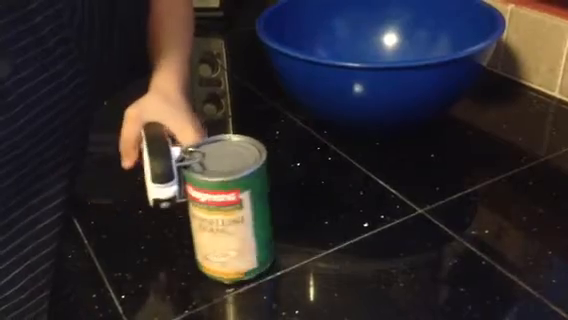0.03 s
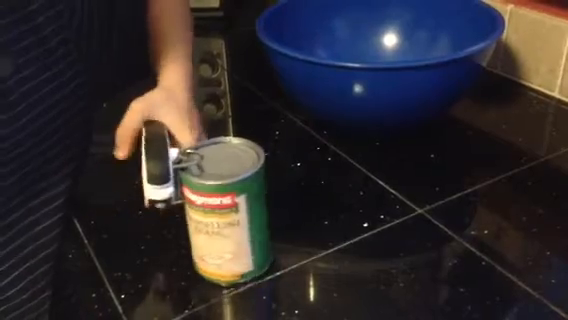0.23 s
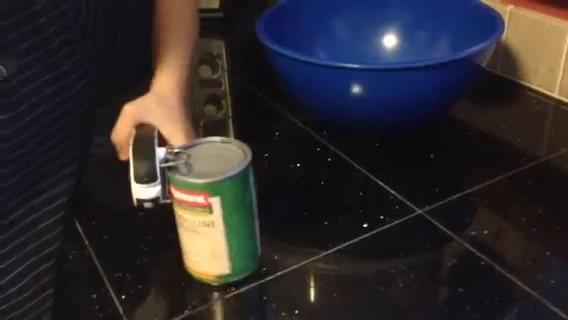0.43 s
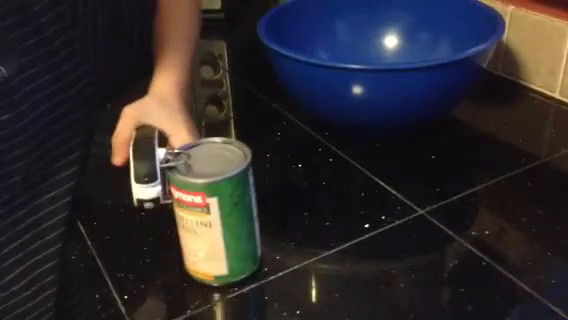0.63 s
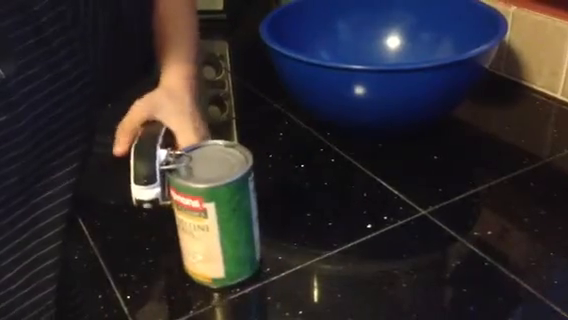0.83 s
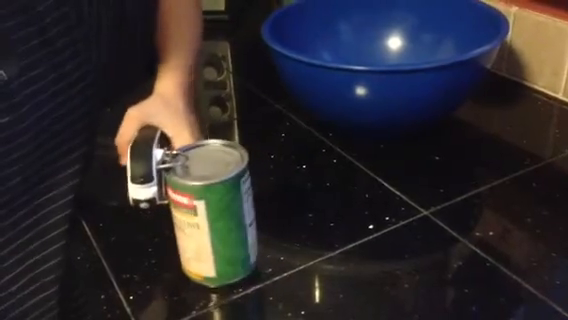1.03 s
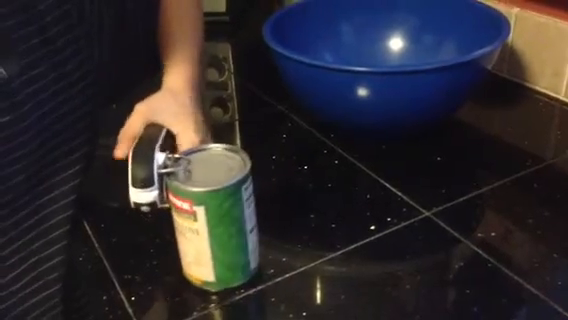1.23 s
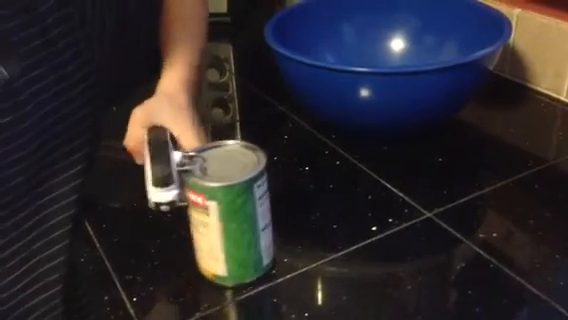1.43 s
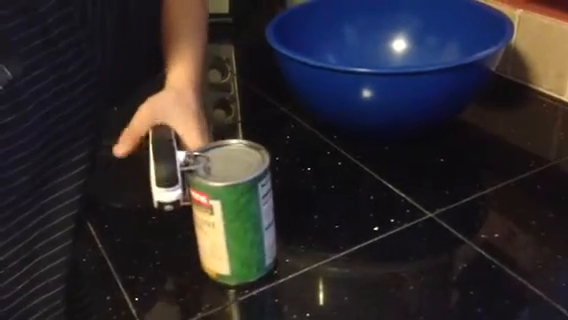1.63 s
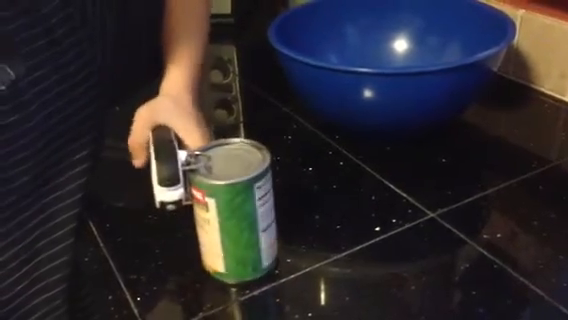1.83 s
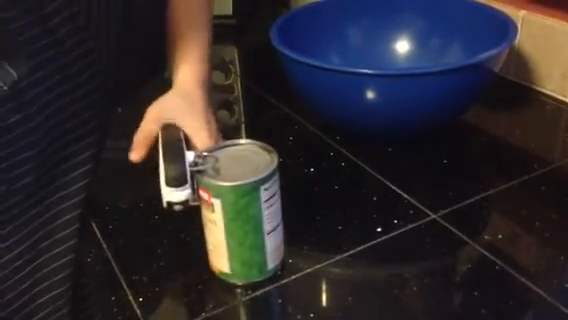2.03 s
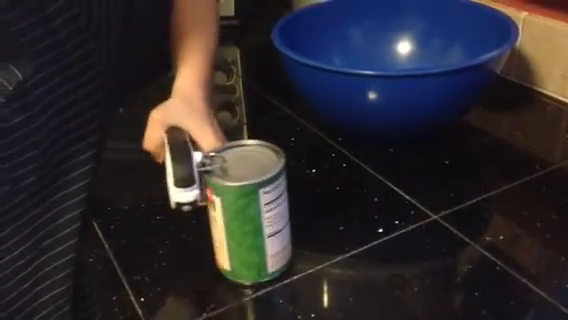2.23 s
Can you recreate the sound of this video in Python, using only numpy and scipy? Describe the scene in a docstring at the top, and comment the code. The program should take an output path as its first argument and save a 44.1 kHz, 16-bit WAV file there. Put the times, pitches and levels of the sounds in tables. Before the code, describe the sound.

A squeeze can opener clicks and ratchets around a tin can in a quiet kitchen.

```python
"""A full tin can knocks on a stone kitchen counter as a squeeze-type opener works round it.
Each release of the handle lets the pawl snap over one to three steel teeth, bright and rattly.
Each squeeze grinds the cutter through the lid and jostles the can; the drive wheel catches
with faint taps. Once the handles clank shut. A small hard room rings after, over a low hush."""
import sys
import numpy as np
from scipy import signal
from scipy.fft import rfft, irfft
from scipy.io import wavfile
from scipy.ndimage import uniform_filter1d

SR = 44100
rng = np.random.default_rng(int(sys.argv[2]) if len(sys.argv) > 2 else 0)


def put_to_file(sound):
    """Save the sound as 16-bit audio at rate SR, in the file named by the first command-line argument."""
    columns = np.atleast_2d(sound).T  # one column per channel
    safe = np.clip(columns, -1, 1)
    whole_steps = np.round(safe * 32767)
    wavfile.write(sys.argv[1], SR, whole_steps.astype(np.int16))


N = 105840
T = np.arange(SR // 3) / SR  # time within one hit, s
SAMPLES_PER_MS = SR / 1000


def amp(db):
    """Decibels to gain."""
    return 10 ** (np.asarray(db) / 20)


def curve_at(points, hz):
    """Reads a curve on a log-frequency axis."""
    f, value = np.transpose(points)
    return np.interp(np.log(hz + 1), np.log(f + 1), value)


def add(mix, start_s, sound):
    """Drops a sound into the mix."""
    part = mix[max(round(start_s * SR), 0):][:len(sound)]
    part += sound[:len(part)]


def normalise(x):
    """Scales to the energy of one millisecond at full level."""
    return x * np.sqrt(SAMPLES_PER_MS / (np.sum(x ** 2) + 1e-20))


def decay(t, t60):
    """Falls 60 dB in t60 seconds."""
    return np.exp(-np.log(1000) * t / np.maximum(t60, 1e-4))


def eq(x, points, size=4096):
    """Minimum-phase EQ through points of f/Hz, level/dB."""
    gain = amp(curve_at(points, np.fft.rfftfreq(size, 1 / SR)))
    cepstrum = irfft(np.log(gain))
    cepstrum[1:size // 2] *= 2
    cepstrum[size // 2 + 1:] = 0
    impulse = irfft(np.exp(rfft(cepstrum)))
    return signal.fftconvolve(x, impulse)[:len(x)]


def burst(colour, attack_s, t60, passes=3, hold_s=0):
    """A dense cluster of short-lived vibrations: a noise hit, evened out in spectrum, then coloured."""
    envelope = np.minimum(T / attack_s, 1) * decay(np.maximum(T - attack_s - hold_s, 0), t60)
    x = rng.standard_normal(len(T)) * envelope
    for _ in range(passes):
        spectrum = rfft(x)
        flat = irfft(spectrum / (abs(spectrum) + 1e-12), len(T))
        x = flat * np.sqrt(envelope)
    return normalise(eq(x, colour))


def ring(modes, t60=None, detune=0.007, attack_s=0.002):
    """Struck modes with their own decays or a shared one; balance and tuning vary from hit to hit."""
    tone = np.zeros(len(T))
    for hz, db, *own_t60 in modes:
        envelope = amp(db + 2 * rng.standard_normal()) * decay(T, own_t60[0] if own_t60 else t60)
        pitch = hz * (1 + detune * rng.standard_normal())
        tone += envelope * np.sin(2 * np.pi * (pitch * T + rng.random()))
    onset = np.sin(np.pi / 2 * np.minimum(T / attack_s, 1)) ** 2
    return normalise(onset * tone)


# Bright edge of a hard contact, for can and pawl: f/Hz, level/dB
CRACK_EQ = [(100, -33), (300, -10.5), (700, -11.5), (1300, -4), (2100, -5.5), (3000, 1.5), (5500, 3.5),
            (7500, -3.5), (11000, -8.5), (15000, -19.5)]
# Tinny bite of the rim: f/Hz, level/dB
RIM_EQ = [(500, -34), (1100, -1.5), (2150, 2), (2800, -8), (15000, -33)]
# Ring of the lid, struck at its rim: f/Hz, level/dB
LID_MODES = [(1150, -3.5), (1250, 2), (1535, -1.5), (1680, -6.5), (1920, -3.5), (2140, -5.5)]
# Hollow clack of the can: f/Hz, level/dB
CLACK_EQ = [(100, -11), (270, -3.5), (680, -7), (1100, -12), (8000, -68)]
# Ring of the can's wall: f/Hz, level/dB, t60/s
WALL_MODES = [(368, -4, 0.044), (659.7, -4.5, 0.072)]
# Low weight of the full can: f/Hz, level/dB, t60/s
THUD_MODES = [(160.3, -11.5, 0.13), (206.8, 7, 0.032), (251, -1, 0.027), (370, -11.5, 0.05)]
# Knock cues, levels before each layer's trim: t/s, thud/dB, clack/dB, rim/dB, tick/dB
KNOCK_CUES = [(0.041, -43.5, -47, -49, -50.5), (.139, -39.5, -45.5, -50.5, -57), (.263, -37, -40, -52, -63),
              (.419, -51, -48.5, -45, -55), (.428, -41, -44, -41, -54), (0.4535, -38, -51, -42, -52.5),
              (0.7518, -29.5, -34, -35.5, -49.5), (1.0212, -41.5, -48.5, -47.5, -53),
              (1.098, -46.5, -47.5, -31.5, -60), (1.171, -35.5, -38.5, -46, -52),
              (1.2335, -47, -74, -52, -45), (1.4626, -46.5, -39.5, -44.5, -53),
              (1.487, -37, -27, -26.5, -22), (1.551, -28, -28.5, -37.5, -44.5),
              (2.356, -55, -39, -41.5, -73)]
SHARP_ATTACK_S, SOFT_ATTACK_S, RIM_T60_S = 0.00065, 0.0056, 0.058


def can_knocks():
    """Each knock: a tick at the contact, the rim and lid, the hollow wall, then the full can's thud."""
    out = np.zeros(N)
    for t, thud_db, clack_db, rim_db, tick_db in KNOCK_CUES:
        tick = amp(4) * burst(CRACK_EQ, SHARP_ATTACK_S, t60=0.032)
        rim = amp(5) * burst(RIM_EQ, SHARP_ATTACK_S, RIM_T60_S)
        lid = amp(4.5) * ring(LID_MODES, t60=0.09)
        clack = amp(4) * burst(CLACK_EQ, SOFT_ATTACK_S, t60=0.059)
        wall = amp(5.5) * ring(WALL_MODES, attack_s=SOFT_ATTACK_S)
        thud = amp(8) * ring(THUD_MODES, detune=0.04, attack_s=0.005)
        add(out, t, amp(tick_db) * tick + amp(rim_db) * (rim + lid) + amp(clack_db) * (clack + wall))
        add(out, t + 0.00738, amp(thud_db) * thud)
    return out


# Rattle of the opener's loose parts: f/Hz, level/dB
RATTLE_EQ = [(100, -18), (300, -4.5), (700, -4.5), (1100, 3), (1600, 9), (2200, 1.5), (3500, 3.5),
             (15000, -7.5)]
# Ring of the opener's steel and the lid: f/Hz, level/dB, t60/s
STEEL_MODES = [(658.6, -9, 0.076), (1260, -4, 0.07), (1430, -3.5, 0.055), (1533, -1.5, 0.06),
               (1674, -3.5, 0.066), (1810, -2, .05), (2556, -2, 0.037)]
# Snap cues, levels relative: t/s, level/dB, body EQ/dB, treble EQ/dB, rattle/dB
SNAP_CUES = [(0.199, -16, 0, 3.5, 0.5), (.218, -9.5, -1.5, 3, -1.5), (0.2321, -12.5, -6.5, 5.5, -4.5),
             (0.7863, -16.5, 1.5, 1, 2), (1.097, -28.5, 1, -3, -16), (1.2738, -14, -1, -2.5, 2),
             (1.2916, -13, 0.5, 4, -1), (1.486, -15.5, -0.5, 0.5, 2.5), (1.6696, -12.5, -1.5, 7.5, -7),
             (1.687, -14, 2, 5, -2.5), (1.7016, -13.5, 0, 7.5, -5.5), (2.087, -13, -3, -3.5, -0.5),
             (2.1082, -14.5, -1, 2, 1.5), (2.3557, -37.5, 5.5, -8.5, 9.5)]


def pawl_snaps(skid_s=0.003, crack_t60=0.0046):
    """The pawl skids over a tooth's tip and lands with a crack; loose parts rattle, the steel rings."""
    out = np.zeros(N)
    for t, db, body_db, treble_db, rattle_db in SNAP_CUES:
        crack = burst(CRACK_EQ, SHARP_ATTACK_S, crack_t60, passes=1, hold_s=0.0009)
        rattle = amp(rattle_db + 1) * burst(RATTLE_EQ, attack_s=0.00044, t60=0.062)
        steel = amp(-4.5) * ring(STEEL_MODES, detune=0.02)
        colour = [(1700, body_db), (3200, 0.005), (5500, 0.0039), (9000, treble_db)]
        add(out, t, amp(db - 3.5) * eq(crack + rattle + steel, colour))
        skid = burst(RATTLE_EQ, skid_s, crack_t60)
        add(out, t - skid_s, amp(db - 16) * skid)
    return out


# Grit of the lid being cut: f/Hz, level/dB
GRIND_EQ = [(100, -9), (300, -10), (640, 3), (1300, -3), (2000, -9), (2800, -19), (15000, -35)]
# Rumble of the can on stone: f/Hz, level/dB
RUMBLE_EQ = [(50, -41), (105, -38.5), (155, 6), (230, -3), (330, -5), (900, -39)]
# Cutting strokes: t/s, length/s, grind/dB, rumble/dB
CUT_CUES = [(0.414, 0.056, -47, -45.5), (1.411, 0.078, -49.5, -50), (1.821, 0.11, -50, -49),
            (2.26, 0.076, -50.5, -50.5)]


def cutter_grind(slips_per_s=450, slip_spread_db=3.2):
    """Tiny slips of the cutter in the lid, over the rumble of the can dragging on the counter."""
    out = np.zeros(N)
    for t, length_s, grind_db, rumble_db in CUT_CUES:
        arch = np.sin(np.pi * np.minimum(T / length_s, 1))
        stroke = np.sqrt(np.maximum(arch, 0))
        slips = rng.standard_normal(len(T)) * (rng.random(len(T)) < slips_per_s / SR)
        slips *= amp(slip_spread_db * rng.exponential(1, len(T)))
        grind = normalise(eq(slips * stroke, GRIND_EQ))
        rumble = normalise(eq(rng.standard_normal(len(T)) * stroke, RUMBLE_EQ))
        length_gain = np.sqrt(length_s * 1000 / 2)  # long strokes play as loud as short ones
        add(out, t, length_gain * (amp(grind_db) * grind + amp(rumble_db) * rumble))
    return out


# The drive wheel catching on the rim: t/s, level/dB
CATCH_CUES = [(.942, -52.5), (1.35, -39), (1.425, -42), (1.834, -47), (1.867, -48), (1.927, -59),
              (2.254, -44.5), (2.275, -46.5), (2.296, -41)]


def wheel_catches():
    """Faint taps, heard through the rim and the can's wall, as the toothed wheel catches."""
    out = np.zeros(N)
    for t, db in CATCH_CUES:
        rim = burst(RIM_EQ, SOFT_ATTACK_S, RIM_T60_S)
        wall = ring(WALL_MODES, attack_s=SOFT_ATTACK_S)
        add(out, t, amp(db) * (rim + wall))
    return out


# Ring of the steel handles: f/Hz, level/dB
HANDLE_MODES = [(890, -10), (1160, -1.5), (2100, -0.5), (3750, -2), (4400, -1), (5220, -1), (6100, -8)]


def handle_clank(start_s=1.4855):
    """One tight clank of steel on steel as the handles hit their stop."""
    out = np.zeros(N)
    add(out, start_s, amp(-15.5) * ring(HANDLE_MODES, t60=0.024))
    return out


# Tail of the small hard room: f/Hz, t60/s, level/dB
REVERB_BANDS = [(201, 0.57, -5), (480, 0.18, -2), (661, 0.2, -3.5), (1150, 0.25, -3.5), (1730, .29, -3),
                (2410, 0.22, -6.5), (4920, 0.25, -6), (15000, 0.17, -9)]


def kitchen_reverb(send, predelay_s=0.0015, attack_s=0.0014, drift_s=0.11, tails=3, size=256):
    """Dense reflections off counter and tiles; crossfading tails give each click its own pattern."""
    out, bands = np.zeros(N), np.array(REVERB_BANDS)
    for k in range(tails):
        hz, t, spectra = signal.stft(rng.standard_normal(SR // 2), SR, nperseg=size)
        t60, gain = curve_at(bands[:, [0, 1]], hz), amp(curve_at(bands[:, [0, 2]], hz))
        spectra = spectra * decay(t, t60[:, None])
        band_energy = uniform_filter1d(np.sum(abs(spectra) ** 2, axis=1), 3)
        spectra *= (gain / np.sqrt(band_energy))[:, None]
        tail = signal.istft(spectra, SR, nperseg=size)[1] * np.sqrt(3) / size
        tail *= np.clip((np.arange(len(tail)) / SR - predelay_s) / attack_s, 0, 1)
        crossfade = np.sqrt(2 / tails) * np.cos(np.pi * (np.arange(N) / SR / drift_s - k / tails))
        out += signal.fftconvolve(send * crossfade, tail)[:N]
    return out


# Hush of the kitchen: f/Hz, level/dB
HUSH_EQ = [(25, -28.5), (85, -6), (150, -0.5), (215, 3), (340, -11), (800, -19), (2500, -23),
           (15000, -27.5)]


def room_tone(rms_db=-60):
    """A low, steady bed with a faint hiss."""
    bed = eq(rng.standard_normal(N), HUSH_EQ)
    return amp(rms_db) * bed / bed.std()


def scene():
    """Opener and can in the kitchen, in mono; the pawl has the hottest reverb send."""
    snaps = pawl_snaps()
    tin = can_knocks() + cutter_grind() + wheel_catches()
    clank = handle_clank()
    reverb = kitchen_reverb(snaps + amp(-1) * tin + amp(-6.5) * clank)
    return (snaps + tin + clank + reverb + room_tone())[None]


# Low shelf on the whole mix: f/Hz, level/dB
LOW_SHELF = [(25, -12), (105, -13), (150, 0)]


def record(dry):
    """Master EQ: thins the deep bass and cuts the very top."""
    thinned = eq(dry[0], LOW_SHELF)
    high_cut = signal.firwin(255, cutoff=15500, window=("kaiser", 8), fs=SR)
    return signal.oaconvolve(thinned, high_cut, "same")[None]


dry = scene()
out = record(dry)
put_to_file(out)
```